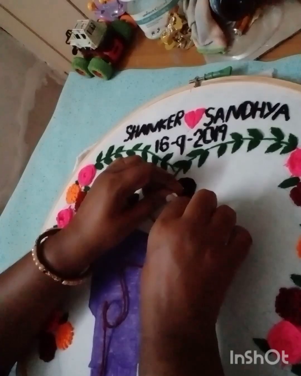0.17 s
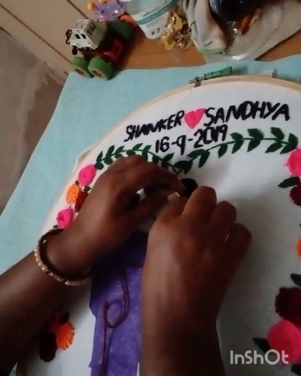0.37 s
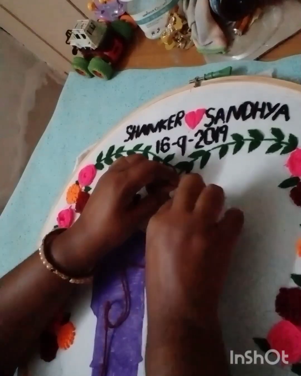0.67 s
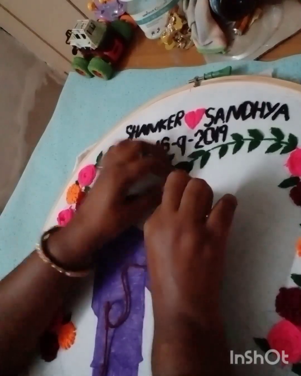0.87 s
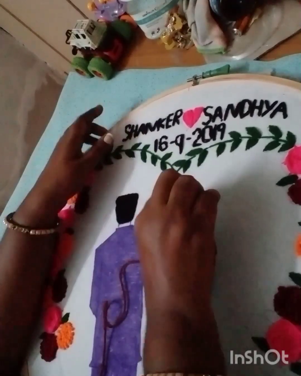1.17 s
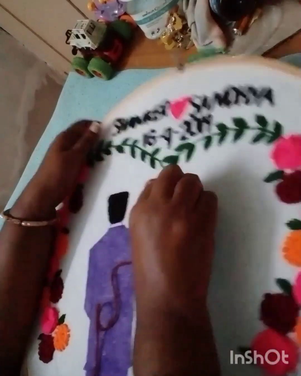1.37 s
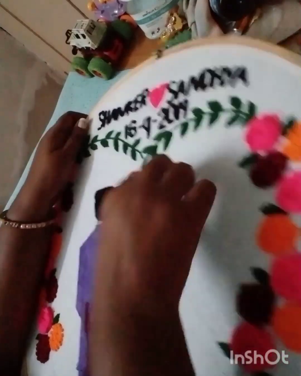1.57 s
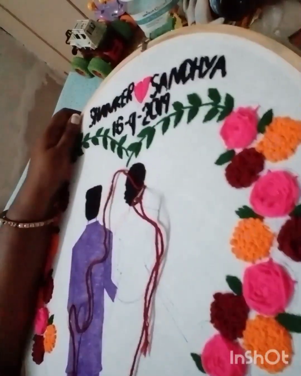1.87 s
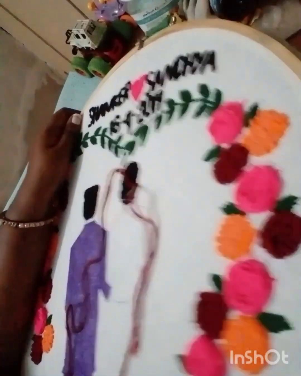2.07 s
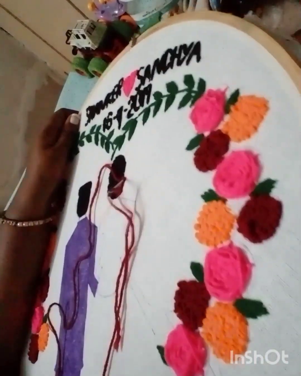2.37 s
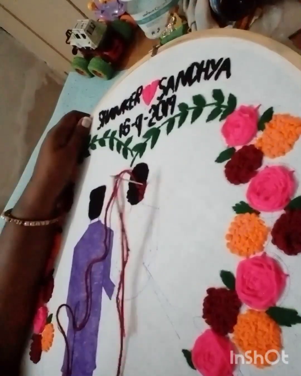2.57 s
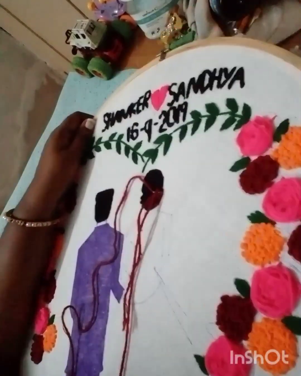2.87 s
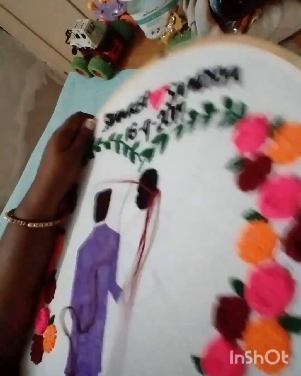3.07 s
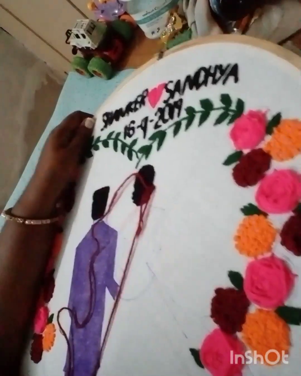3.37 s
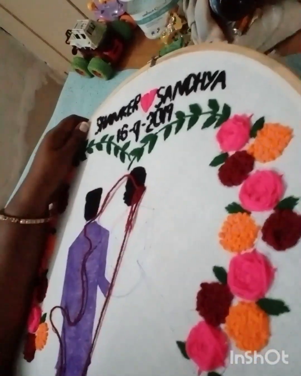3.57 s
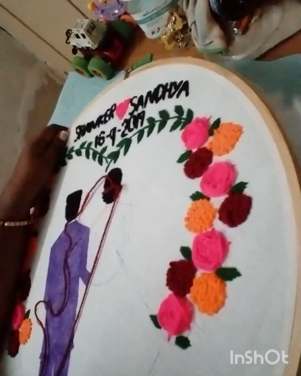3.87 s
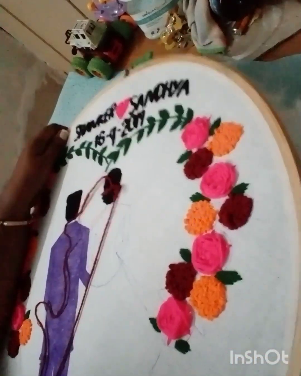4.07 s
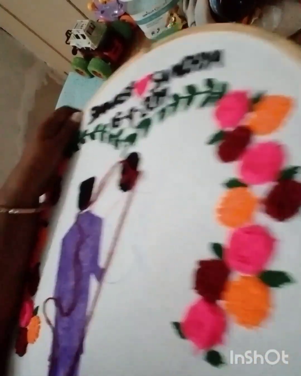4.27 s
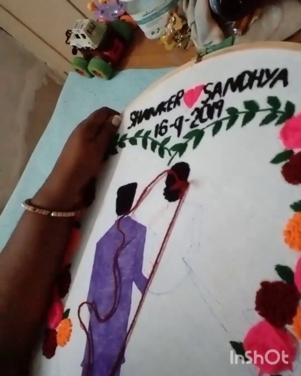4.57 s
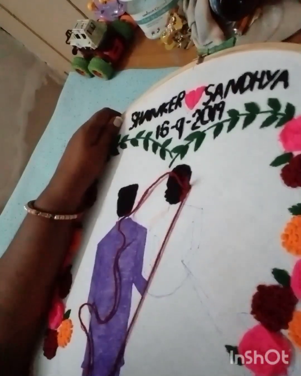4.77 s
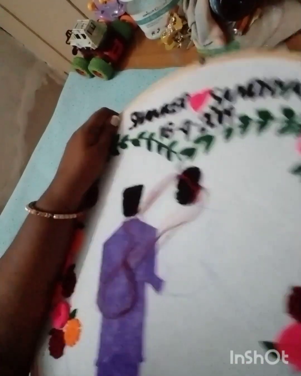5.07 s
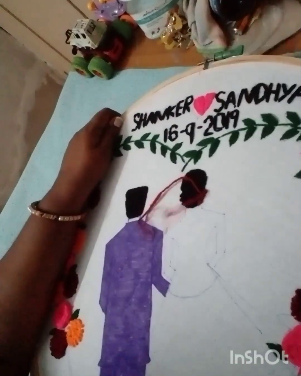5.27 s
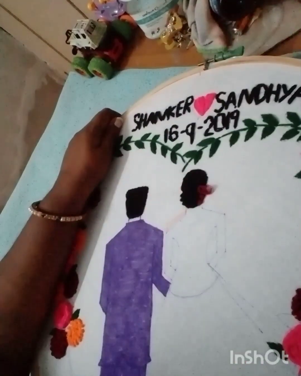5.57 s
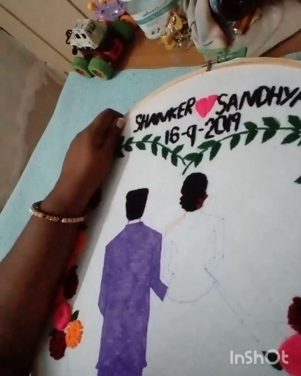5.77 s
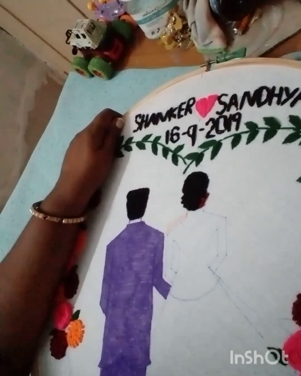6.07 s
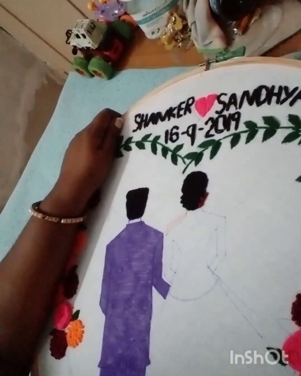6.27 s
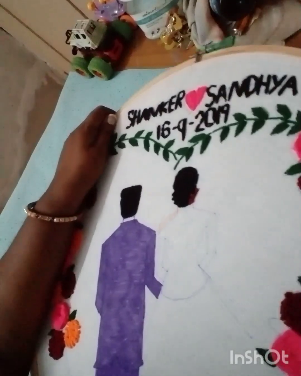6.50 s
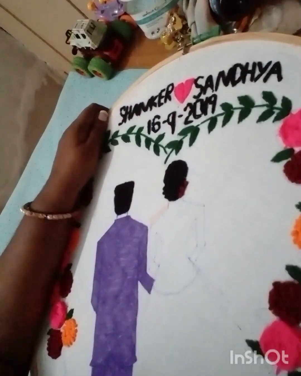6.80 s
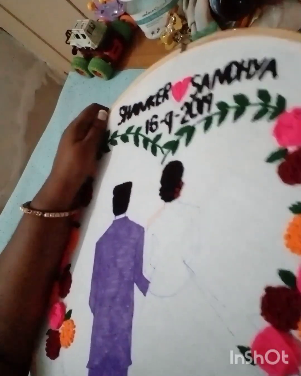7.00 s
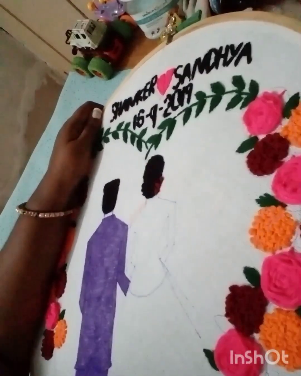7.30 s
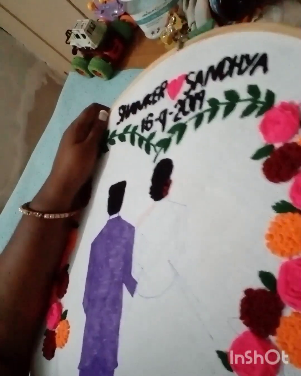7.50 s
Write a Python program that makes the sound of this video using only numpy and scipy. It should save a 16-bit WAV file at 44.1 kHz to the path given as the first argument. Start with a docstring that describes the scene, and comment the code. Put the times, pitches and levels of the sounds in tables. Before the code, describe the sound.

Close, drum-like needle pops and scratchy thread pulls on fabric stretched in a hoop, in a quiet room with distant birds.

```python
"""A needle pops through cloth stretched drum-tight in an embroidery hoop, close up in a small room.
Each pop cracks the fibres apart and sets the cloth ringing like a small drumhead. The tip scratches
about, and thread rasps through the weave in pulls made of tiny slips, snagging once.
Hands rub, shift and tap on the hoop and cloth; birds call faintly outside, over a bed of room tone."""
import sys
import numpy as np
from scipy import signal
from scipy.fft import rfft, irfft
from scipy.io import wavfile

SR = 44100
rng = np.random.default_rng(int(sys.argv[2]) if len(sys.argv) > 2 else 0)


def wrap_up_sound(samples):
    """Save the sound to the file named by the first command line argument, as 16-bit audio."""
    columns = np.atleast_2d(samples).T
    # keep every value between -1 and 1, then stretch to whole-number steps
    tamed = np.clip(columns, -1, 1)
    steps = np.round(tamed * 32767).astype(np.int16)
    wavfile.write(sys.argv[1], SR, steps)


N = 336924
TIME = np.arange(N) / SR

# low hum and hiss of the still room: (frequency [Hz], spectral level [dB])
ROOM_TONE_EQ = [(15, -36.5), (25, -7), (59, 3), (113, 2), (194, -7), (557, -10), (981, -20.5),
                (1550, -22.5), (2330, -26.5), (3390, -27), (3990, -29), (4950, -26.5), (6490, -31.5),
                (12400, -23.5), (15800, -26)]
# brushes of skin over the cloth: (time [s], level [dB], brightness [dB/octave])
RUBS = [(0, -62.5, -2.5), (.83, -62, -2.5), (1.671, -60.5, 2.5), (2.48, -61, -3), (3.87, -55.5, -2),
        (5.841, -62.5, -2.5), (6.67, -63.5, -5), (7.5, -64, -1.5)]
# colour of skin or thread sliding on the weave: (frequency [Hz], spectral level [dB])
FRICTION_EQ = [(150, -14.5), (380, 2.5), (750, 6), (1000, -2), (1550, 1.5), (2000, -1.5), (2450, 0),
               (4000, 1.5), (5600, -3), (7300, 3), (9000, -4.5), (15000, -8)]
# a mid-pitched bird: (time [s], level [dB])
MID_CALLS = [(.085, -64.5), (2.829, -74), (5.84, -71)]
# a shrill bird: (time [s], level [dB])
SHRILL_CALLS = [(.185, -66), (.536, -63), (.914, -63.5), (1.358, -66), (4.402, -71), (4.772, -66),
                (5.275, -66.5)]
# long, hoarse calls far away: (time [s], level [dB])
HOARSE_CALLS = [(.53, -71), (5.275, -67.5)]
# the grip shifts on the hoop and settles: (time [s], level [dB], settling time [s])
GRIP_SHIFTS = [(.68, -66.5, 0.29), (1.16, -59, 0.54), (3.168, -48.5, 0.1), (3.88, -46.5, 0.066),
               (4.19, -48, .08), (4.532, -51, 0.12), (4.724, -45.5, 0.034), (5.15, -60.5, 1),
               (6.87, -51, .07)]
# colour of the handling rumble: (frequency [Hz], spectral level [dB])
RUMBLE_EQ = [(25, -36), (45, -4), (65, 6.5), (100, 0), (200, -7), (370, -8), (500, -36), (750, -31),
             (1400, -37), (3000, -54)]
# modes of the taut cloth: (frequency [Hz], level [dB], t60 before damping [s])
CLOTH_MODES = [(59.8, -5, 0.81), (120.4, -6, 0.37), (179, -5, 0.65), (237, -5.5, 0.66), (293.5, 0.5, 0.25),
               (341, 3, 0.17), (358, 6, 0.23), (383, 1, 0.31), (444, -30.5, 0.16), (536, -2.5, 0.26),
               (573, 8, 0.07), (569.5, 2.5, 0.18), (637, -0.5, 0.17), (671, -15, 0.33), (684, -3.5, 0.19),
               (764, 6, 0.052), (767, -3.5, 0.19), (847, -2.5, 0.22), (933, -6.5, 0.13), (1007, -12, 0.2),
               (1160, -37, 0.15), (1166, -37, 0.17), (1206, 2, 0.25), (1527, 2, 0.18), (1693, -12, 0.59)]
# single fibres catching: (time [s], relative level [dB])
TICKS = [(0.771, -53), (1.123, -57), (2.066, -47), (3.761, -46), (3.831, -38), (4.16, -50), (4.184, -37.5),
         (4.725, -63)]
# pulls of the thread: (time [s], length [s], level [dB], swell [dB], brightness [dB/octave])
PULLS = [(0.852, 1, -68.5, -6, -2), (2.067, .2, -61, 3, -0.5), (2.299, 0.25, -67, 3, 1.5),
         (2.796, 0.069, -71, 6, 2), (3.16, 0.082, -59.5, 2, -1), (3.329, 0.14, -51.5, -15, -1),
         (3.503, 0.21, -57.5, -11, 1), (3.688, 0.2, -62, 7.5, -0.5), (4.169, .05, -48, 2, 2),
         (4.23, 0.18, -56, -4.5, -1.5), (4.496, 0.14, -70.5, 3, -1.5), (4.824, 0.26, -59.5, 9, 0.7),
         (5.069, 0.69, -61, -1.5, -1.7), (6.501, 0.46, -78.5, 12.5, 1), (7.093, 0.32, -60.5, -6.5, 0)]
# the tip scratching and the thread rasping in its hole: (time [s], length [s], level [dB])
SCRATCHES = [(1.006, 0.048, -65.5), (1.047, .012, -65), (1.121, 0.0071, -61.5), (1.187, 0.0054, -60),
             (1.226, 0.039, -62.5), (1.927, 0.046, -64.5), (3.21, 0.033, -49.5), (3.287, 0.0079, -44),
             (3.329, 0.052, -48.5), (4.826, 0.045, -56.5)]
# needle and snagged thread popping through:
# (time [s], ring level [dB], contact pitch [Hz], crack level [dB], thump level [dB])
POPS = [(2.127, -54.5, 650, -47.5, -58), (2.1467, -24.5, 570, -32, -49), (2.1764, -24.5, 553, -26.5, -38),
        (3.163, -49, 557, -60, -48), (5.011, -42, 850, -32.5, -57), (5.023, -35, 440, -42, -55),
        (5.041, -47, 600, -26, -26.5), (5.0513, -28, 360, -20.5, -33), (5.083, -30, 590, -60, -24)]
# colour of fibres snapping apart: (frequency [Hz], spectral level [dB])
CRACK_EQ = [(300, 0), (900, 8), (1600, -10.5), (2400, -1.5), (3800, -1.5), (5000, -10.5), (7000, -9.5),
            (10000, -19.5), (16000, -30)]
# fingers tapping the cloth: (time [s], ring level [dB], crack level [dB], skid length [s])
TAPS = [(6.847, -48, -52, 0.063), (7.045, -56.5, -80, .015), (7.08, -53, -80, .015),
        (7.109, -40.5, -53, 0.022), (7.159, -34, -41, 0.0035)]
TAP_HZ = 340   # a fingertip is softer than the needle


def room_tone(level_db=-63, side_db=-81):
    """A steady stereo bed: dark noise in the centre, a trace of bright hiss for width."""
    centre = from_db(level_db) * colour(rng.standard_normal(N), ROOM_TONE_EQ)
    side = from_db(side_db) * colour(rng.standard_normal(N), [(2000, -69), (5000, -1.5), (12000, 3.5)])
    return centre + side * np.array([[1], [-1]])


def gesture(start_s, length_s, attack_s, release_s, swell_db=0):
    """A move sets in, swells or fades while held, then tails off: its sample indices and envelope."""
    end_s = start_s + length_s + 6 * release_s
    at = np.arange(max(round(start_s * SR), 0), min(round(end_s * SR), N))
    t = TIME[:len(at)]
    attack = 1 - np.exp(-t / attack_s)
    hold = from_db(swell_db * np.minimum(t / (length_s + 1 / SR), 1))
    release = np.exp(-np.maximum(t - length_s, 0) / release_s)
    return at, attack * hold * release


def friction(slips, brightness):
    """Slips over the weave take its colour, tilted by a brightness in dB per octave."""
    hz, db = np.transpose(FRICTION_EQ)
    tilted_eq = np.column_stack([hz, db + brightness * np.log2(hz / hz[0])])
    return colour(slips * rng.choice([-1, 1], len(slips)), tilted_eq)


def skin_rubs(hollow_db=5):
    """Skin brushes the cloth briefly, with a hollow ring from the hoop."""
    out, slips = np.zeros(N), grains(per_s=4000, spread_db=2.5)
    for s, db, brightness in RUBS:
        at, speed = gesture(s, length_s=0.02, attack_s=0.0096, release_s=0.045)
        brush = friction(slips[at], brightness)
        hollow = from_db(hollow_db) * resonance(brush, hz=1150, width_hz=600)
        out[at] += from_db(db) * speed * (brush + hollow)
    return out


def bird(calls, hz, length_s, hoarse_hz, octave_db=None, arch=0.0401, fall=0.044):
    """One bird repeats a thin, hoarse whistle, arched and falling; a shrill one adds the octave."""
    out, wobble = np.zeros(N), drift(per_s=700)
    progress = np.linspace(0, 1, round(length_s * SR))
    contour = hz * (1 - arch * (2 * progress - 1) ** 2 - fall * (progress - 0.5))
    envelope = 2 * np.sqrt(progress * (1 - progress))
    for s, db in calls:
        pitch = contour + hoarse_hz * wobble[round(s * SR):][:len(progress)]
        phase = 2 * np.pi * np.cumsum(pitch) / SR
        octave = 0 if octave_db is None else from_db(octave_db) * np.sin(2 * phase)
        add(out, s, from_db(db) * envelope * (np.sin(phase) + octave))
    return out


def birds_outside(gain_db=2, direct_db=-14):
    """Three birds, blurred by the walls on their way in."""
    song = (bird(MID_CALLS, hz=3320, length_s=0.11, hoarse_hz=160)
            + bird(SHRILL_CALLS, hz=4890, length_s=0.09, hoarse_hz=65, octave_db=-8)
            + bird(HOARSE_CALLS, hz=1552, length_s=0.38, hoarse_hz=252))
    wash = reverberation(song, t60=0.64, delay_s=0.0033)
    return from_db(gain_db) * (from_db(direct_db) * song + wash)


def hoop_handling(lumpy_db=4, drum_db=-13):
    """Skin drags on the hoop: a lumpy rumble that also stirs the cloth's modes."""
    force = np.zeros(N)
    for s, db, settle_s in GRIP_SHIFTS:
        at, push = gesture(s, length_s=0, attack_s=0.0096, release_s=settle_s)
        force[at] += from_db(db) * push
    drag = grains(per_s=2500, spread_db=1.5) * from_db(lumpy_db * np.tanh(drift(per_s=30)))
    rumble = rms_one(colour(drag, RUMBLE_EQ))
    drum = rms_one(cloth([rumble] * len(CLOTH_MODES), damping=1.3))
    return force * (rumble + from_db(drum_db) * drum)


def cloth(drives, damping, loss_hz=1500):
    """The cloth rings, one drive per mode; neighbours swing opposite ways and highs are damped more."""
    return sum((-1) ** k * from_db(db) * ring(drive, hz, t60 / (damping + hz / loss_hz))
               for k, (drive, (hz, db, t60)) in enumerate(zip(drives, CLOTH_MODES)))


def fibre_ticks(decay_s=0.0022, gain_db=-5):
    """A caught fibre lets go with a tiny bright snap."""
    bursts = np.zeros(N)
    for s, db in TICKS:
        add(bursts, s, from_db(db + gain_db) * np.exp(-TIME[:SR // 20] / decay_s))
    return colour(bursts * rng.standard_normal(N), [(500, 7), (2500, 7), (8000, 1), (16000, -18)])


def thread_pulls(uneven_db=2.5, waver_db=1):
    """Thread rasps through the weave in dense little slips, each pull with its own brightness."""
    out, slips = np.zeros(N), grains(per_s=5000, spread_db=2)
    slips *= from_db(uneven_db * drift(per_s=52) + waver_db * drift(per_s=16))
    for s, length_s, db, swell_db, brightness in PULLS:
        # longer pulls ease in and out more gently
        attack_s, release_s = 0.0035 + 0.024 * length_s, 0.02 + 0.14 * length_s
        at, speed = gesture(s, length_s, attack_s, release_s, swell_db)
        out[at] += from_db(db) * speed * friction(slips[at], brightness)
    return out


def needle_scratches(squeak_hz=1817, squeak_at_db=-51, overtone=1.243, width_hz=150, grit_db=-21):
    """The tip skips from fibre to fibre and excites two squeaky resonances over a dry grit."""
    out, slips = np.zeros(N), grains(per_s=4500, spread_db=4.5)
    grit_eq = [(200, -31), (1100, 14), (3500, 3.5), (5000, 6), (6000, -1), (7500, -2), (10000, -44)]
    grit = from_db(grit_db) * colour(slips, grit_eq)
    for s, length_s, db in SCRATCHES:
        at, pressure = gesture(s, length_s, attack_s=0.0037, release_s=0.016)
        hz = squeak_hz * from_db(db - squeak_at_db) ** 0.094   # harder scratches squeak a little higher
        squeak = resonance(slips[at], hz, width_hz) + resonance(slips[at], hz * overtone, width_hz)
        out[at] += from_db(db) * pressure * rms_one(squeak + grit[at])
    return out


def hits(rebound_s=0.029, rebound_db=-9.5):
    """Pops, rebounds and taps that strike the cloth: (time [s], level [dB], contact pitch [Hz])."""
    pops = [(s, db, hz) for s, db, hz, _, _ in POPS]
    pauses = np.diff([s for s, _, _ in pops], append=np.inf)
    # left alone after a pop, the cloth springs back once
    rebounds = [(s + rebound_s, db + rebound_db, hz)
                for (s, db, hz), pause in zip(pops, pauses) if pause > 2 * rebound_s]
    taps = [(s, db, TAP_HZ) for s, db, _, _ in TAPS]
    return pops + rebounds + taps


def cloth_thuds(contact_q=1.72, thump_hz=105, scatter_s=0.00075):
    """The body of a hit: it kicks the modes near its contact pitch; pops also thump the whole hoop."""
    thumps = [(s, thump_db, thump_hz) for s, _, _, _, thump_db in POPS]
    s, db, contact_hz = np.transpose(hits() + thumps)
    kicks = np.zeros((len(CLOTH_MODES), N))
    arrivals = s[:, None] + scatter_s * rng.random((len(s), len(CLOTH_MODES)))   # each mode a touch late
    for k, (hz, _, _) in enumerate(CLOTH_MODES):
        strength = from_db(db) / np.hypot(1, contact_q * (hz / contact_hz - contact_hz / hz))
        np.add.at(kicks[k], (arrivals[:, k] * SR).astype(int), strength)
    return cloth(kicks, damping=2.23)


def weave_flutter(decay_s=0.015, gain_db=-6):
    """A hit also shakes the weave's countless weak modes, which die as one dense, dry burst."""
    bursts, t = np.zeros(N), TIME[:SR // 5]
    envelope = 2 * (np.exp(-t / decay_s) - np.exp(-4 * t / decay_s))
    for s, ring_db, _ in hits():
        add(bursts, s, from_db(ring_db + gain_db) * envelope)
    eq = [(60, -4.5), (200, -4.5), (500, -2), (780, -0.5), (1000, -14), (2000, -18.5), (5000, -36.5)]
    return colour(bursts * rng.standard_normal(N), eq)


def fibre_cracks(snap_s=0.0024, fray_s=0.021, fray_db=-16):
    """The crisp edge of pops and taps: fibres part with a snap and fray for a moment after."""
    snaps, t = np.zeros(N), TIME[:SR // 5]
    envelope = np.exp(-t / snap_s) + from_db(fray_db) * np.exp(-t / fray_s)
    for s, crack_db in [(s, db) for s, _, _, db, _ in POPS] + [(s, db) for s, _, db, _ in TAPS]:
        add(snaps, s, from_db(crack_db) * envelope)
    return colour(snaps * grains(per_s=17000, spread_db=4), CRACK_EQ)


def finger_skids(width_hz=260, gain_db=-7):
    """A landing fingertip drags over the cloth with a dull, low rub."""
    force = np.zeros(N)
    for s, db, _, length_s in TAPS:
        at, push = gesture(s, length_s, attack_s=0.003, release_s=0.017)
        force[at] += from_db(db + gain_db) * push
    rub = resonance(grains(per_s=2700, spread_db=2), TAP_HZ, width_hz)
    return force * rms_one(resonance(rub, TAP_HZ, 2 * width_hz))


def scene(room_db=-13):
    """The handwork sits close and central in a short reverb; only the faint hiss has stereo width."""
    textures = skin_rubs() + fibre_ticks() + thread_pulls() + needle_scratches()
    impacts = cloth_thuds() + weave_flutter() + fibre_cracks() + finger_skids()
    handwork = textures + impacts
    room = from_db(room_db) * reverberation(handwork, t60=0.3, delay_s=0.009)
    return handwork + room + hoop_handling() + birds_outside() + room_tone()


def record(dry):
    """A steep low-pass shaves off the topmost air."""
    cutoff_hz = 15850
    return signal.sosfilt(signal.ellip(12, 0.1, 80, cutoff_hz, fs=SR, output="sos"), dry)


def from_db(db):
    """Decibels to gain."""
    return 10 ** (np.asarray(db) / 20)


def rms_one(x):
    """Scale to unit rms."""
    return x / np.sqrt(np.mean(x ** 2) + 1e-20)


def add(out, s, sound):
    """Mix a sound in at time s."""
    start = max(round(s * SR), 0)
    out[start:start + len(sound)] += sound[:N - start]


def colour(x, points, size=8192):
    """Minimum-phase EQ through the given points; white noise keeps its power."""
    hz, db = np.transpose(points)
    log_bins = np.log(np.fft.rfftfreq(size, 1 / SR) + 1)
    gain = rms_one(from_db(np.interp(log_bins, np.log(hz), db)))
    cepstrum = irfft(np.log(gain))[:size // 2]
    cepstrum[0] /= 2
    impulse = irfft(np.exp(rfft(2 * cepstrum, size)))
    return signal.oaconvolve(x, impulse)[:len(x)]


def resonance(x, hz, width_hz):
    """Two-pole band-pass with unity gain at its peak."""
    r = np.exp(-np.pi * width_hz / SR)
    feedback = [1, -2 * r * np.cos(2 * np.pi * hz / SR), r * r]
    return signal.lfilter(np.array([1, 0, -1]) * (1 - r * r) / 2, feedback, x + 1e-18)


def ring(x, hz, t60):
    """A unit click sets a sine of height 1 ringing."""
    r, w = np.exp(-np.log(1000) / (t60 * SR)), 2 * np.pi * hz / SR
    return signal.lfilter([0, np.sin(w)], [1, -2 * r * np.cos(w), r * r], x + 1e-18)


def drift(per_s):
    """A random wander with a spread near 1."""
    return np.interp(TIME * per_s, np.arange(N // 40), rng.standard_normal(N // 40))


def grains(per_s, spread_db):
    """Tiny slips of uneven size at random moments; rms 1."""
    sizes = from_db(spread_db * np.minimum(rng.exponential(1, N), 4)) * rng.choice([-1, 1], N)
    return rms_one(sizes * (rng.random(N) < per_s / SR))


def reverberation(x, t60, delay_s):
    """Diffuse reflections that start after a short pre-delay and die away."""
    t = TIME[:SR]
    tail = rng.standard_normal(SR) * np.exp(-np.log(1000) * t / t60) * (t > delay_s)
    return signal.oaconvolve(x, tail / np.linalg.norm(tail))[:N]


dry = scene()
out = record(dry)
wrap_up_sound(out)
```